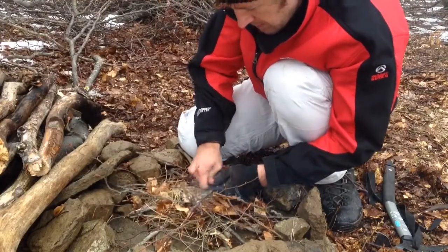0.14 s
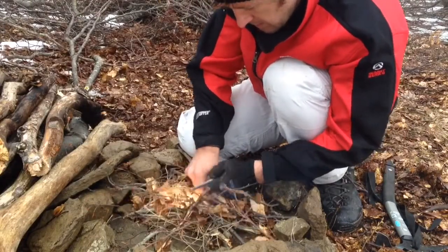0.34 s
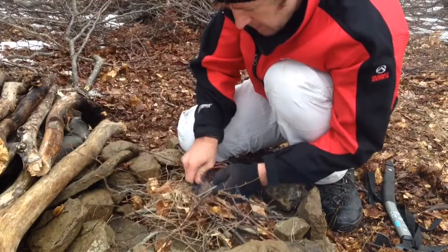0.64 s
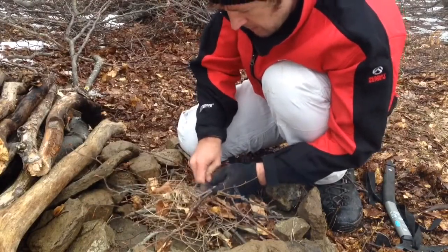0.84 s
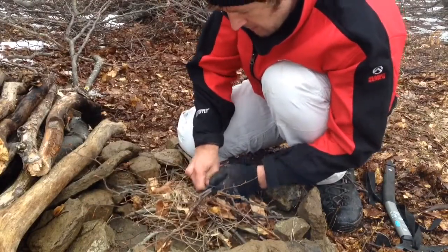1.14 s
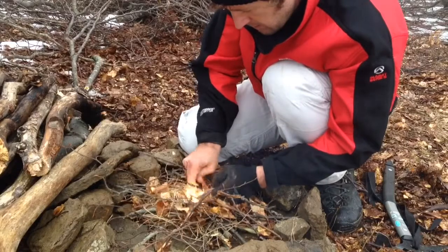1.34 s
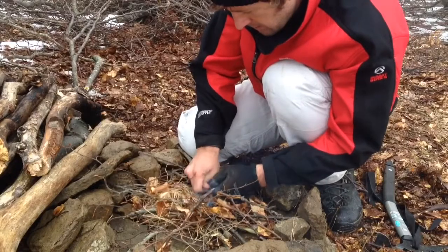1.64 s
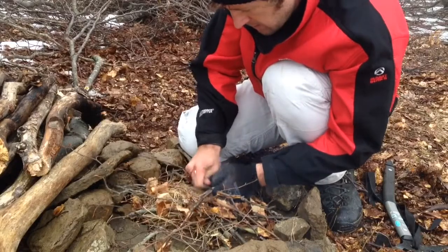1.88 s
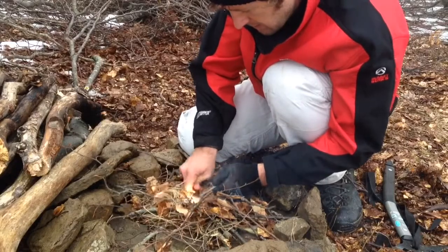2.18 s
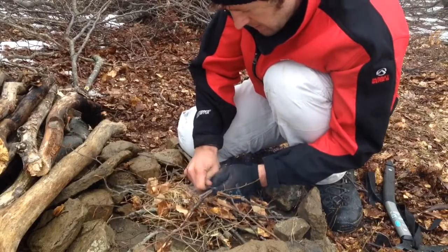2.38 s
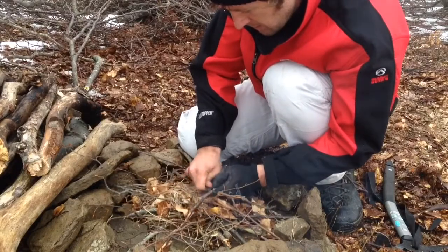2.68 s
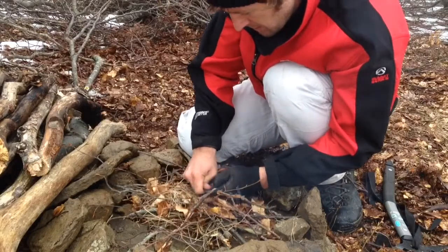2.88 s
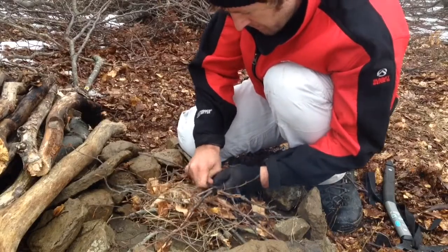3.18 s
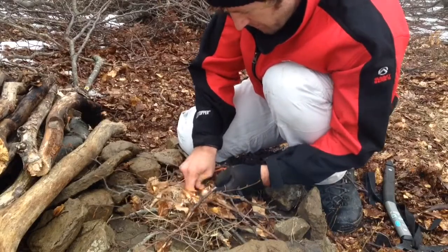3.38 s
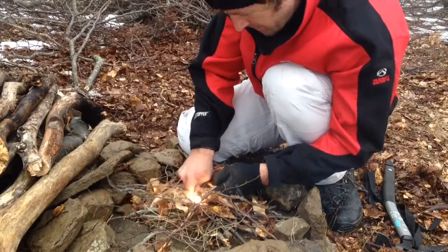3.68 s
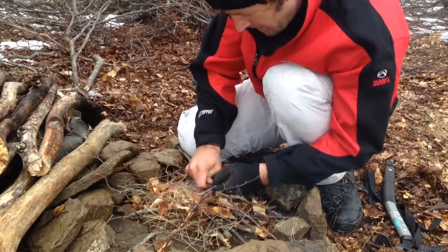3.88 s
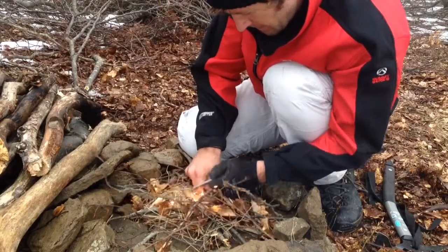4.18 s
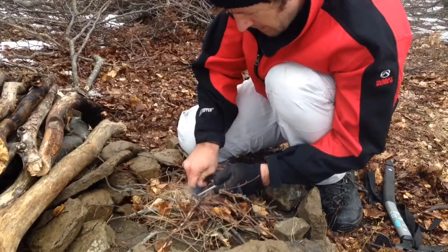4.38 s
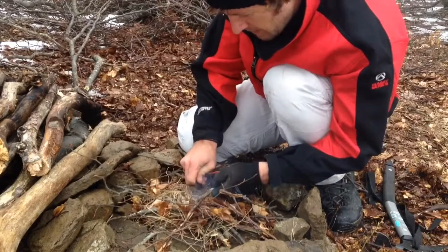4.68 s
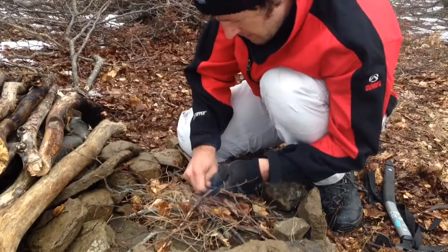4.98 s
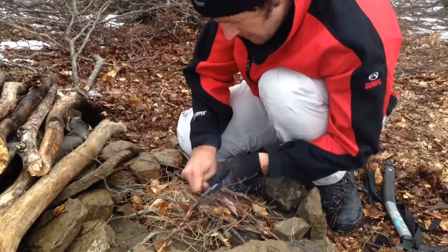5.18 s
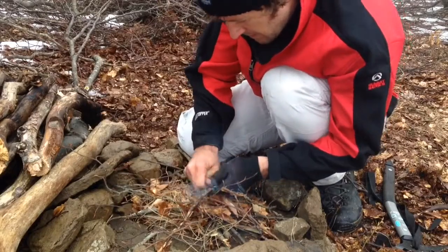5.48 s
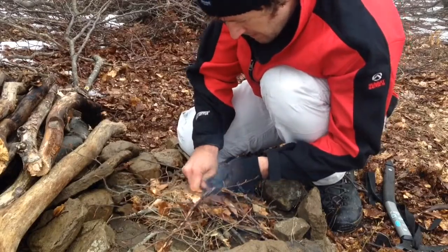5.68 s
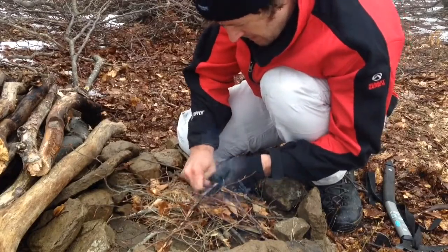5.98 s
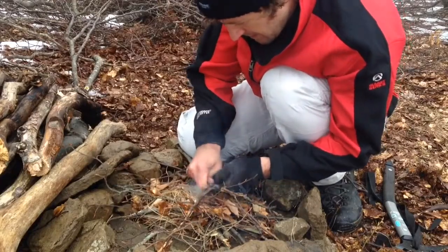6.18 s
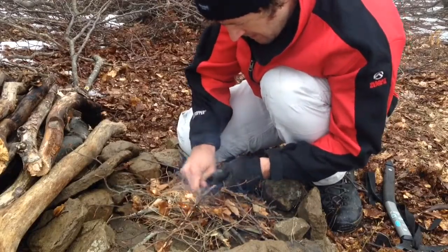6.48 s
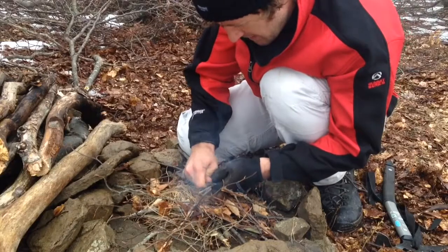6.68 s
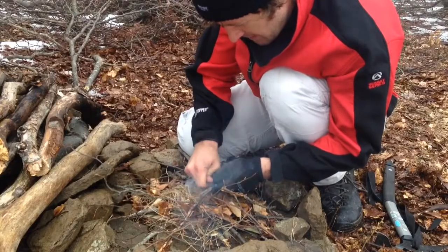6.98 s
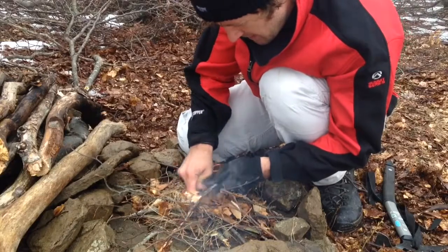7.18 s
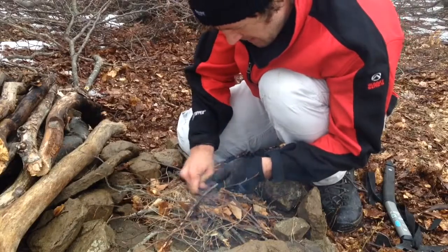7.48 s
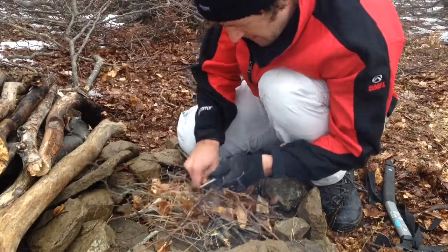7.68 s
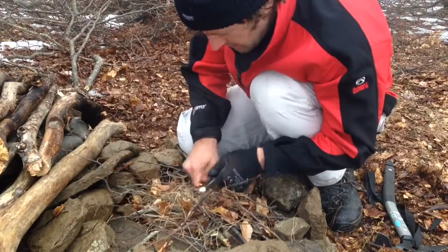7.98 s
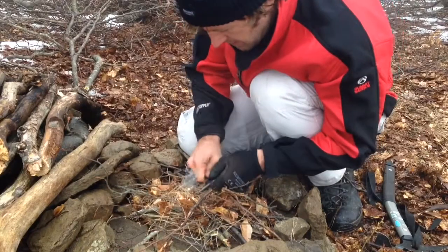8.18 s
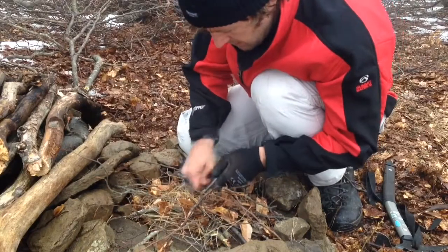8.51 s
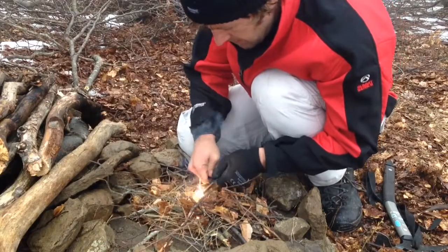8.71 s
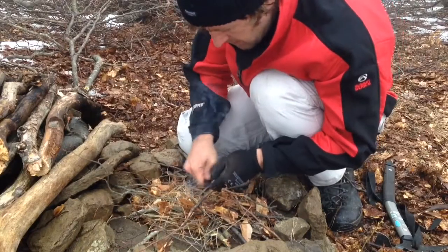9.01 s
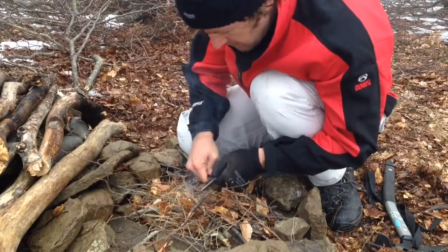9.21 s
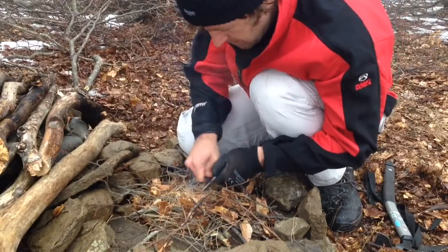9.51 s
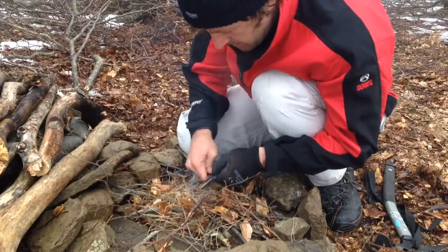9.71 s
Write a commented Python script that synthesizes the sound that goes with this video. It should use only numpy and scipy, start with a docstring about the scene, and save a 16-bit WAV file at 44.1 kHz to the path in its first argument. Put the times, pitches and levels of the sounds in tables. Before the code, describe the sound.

Short, dry metal scrapes repeat roughly two or three per second, bright and gritty, each flaring with a low puff and crackling sparks. Between them come ticks on the rod, faint scuffs and the rustle of sleeves and dry leaves. The longest pause precedes five seconds. The microphone is near, with almost no echo and a faint outdoor hush; the sound briefly cuts out near 7.8 seconds.

```python
"""From the start, a steel striker is scraped down a fire steel twenty times, close by, in a still wood.
Each stroke opens with a rising zip, rasps along the rod and throws sparks that flare and spit.
Light rubs, clicks on the rod and swells of rustle fill the pauses; the longest comes before five seconds.
Two dull bumps of twigs follow it, and the steady rustle starts to thin out at about six seconds.
All sound drops out briefly before eight seconds, another pair of bumps comes, and strokes go on to the end."""
import sys
import numpy as np
from scipy import signal
from scipy.fft import rfft, irfft
from scipy.io import wavfile
from scipy.ndimage import map_coordinates

SR = 44100
rng = np.random.default_rng(int(sys.argv[2]) if len(sys.argv) > 2 else 0)


def to_wav(s):
    """Save 16-bit WAV."""
    ch = np.atleast_2d(s).T  # columns
    pcm = np.round(np.clip(ch, -1, 1) * 32767)  # PCM
    wavfile.write(sys.argv[1], SR, pcm.astype(np.int16))


N = 434385
T = np.arange(N) / SR  # s


def amp(db):
    """Decibels to gain."""
    return 10 ** (np.asarray(db) / 20)


def unit(x):
    """Scales to rms 1."""
    return x / np.sqrt(np.mean(x ** 2) + 1e-20)


def add(mix, s, sound):
    """Mixes a sound in at time s."""
    part = mix[max(round(s * SR), 0):][:len(sound)]
    part += sound[:len(part)]


def colour(x, spectrum, size=4096):
    """Causal filter with the given spectrum, so that clicks keep their sharp fronts."""
    hz, db = np.transpose(spectrum)
    bin_hz = abs(np.fft.fftfreq(size, 1 / SR))
    log_gain = np.log(amp(np.interp(np.log(bin_hz + 1), np.log(hz), db)))
    minimum_phase = np.exp(np.conj(signal.hilbert(log_gain)))
    taps = np.fft.ifft(minimum_phase).real
    return signal.oaconvolve(x, taps[:size // 2])[:len(x)]


def resonate(x, hz, width_hz):
    """A resonance of gain 1 at a fixed or moving frequency."""
    turn = np.exp(2j * np.pi * np.cumsum(hz * np.ones(len(x))) / SR)
    r = np.exp(-np.pi * width_hz / SR)
    # shift the resonance down to 0 Hz, smooth there and shift back
    smoothed = signal.lfilter([1 - r], [1, -r], x / turn + 1e-18)
    return 2 * (turn * smoothed).real


def wander(rate_hz):
    """Smooth chance of rms 1, moving mostly slower than the given rate."""
    slowness = np.exp(-(np.fft.rfftfreq(N, 1 / SR) / rate_hz) ** 2)
    return unit(irfft(rfft(rng.standard_normal(N)) * slowness, N))


def grains(per_s, spread_db, largest=4.44):
    """Random impulses of rms 1 in all; most sizes lie close together, a few stray by several spreads."""
    size = amp(spread_db * np.minimum(rng.exponential(1, N), largest))
    sign = np.sign(rng.standard_normal(N))
    return unit(size * sign * (rng.random(N) < per_s / SR))


# tone of the outdoor air: pitch_hz [Hz], level_db [dB per Hz, relative]
AIR_SPECTRUM = [(15, -33), (25, -31), (59, -0.5), (144, -4.5), (178, -3.5), (227, -4), (260, -6),
                (305, -7.5), (340, -6), (368, -7), (445, -5), (552, -8.5), (997, -12.5), (12800, -24),
                (15500, -27)]


def air(level_db=-59.5, swell_db=2.5):
    """Faint hush of the wood: coloured noise that swells slowly by a few dB."""
    hush = unit(colour(rng.standard_normal(N), AIR_SPECTRUM))
    return amp(level_db) * hush * amp(swell_db * wander(rate_hz=2.5))


# tone of cloth and dry leaves: pitch_hz [Hz], level_db [dB per Hz, relative]
CLOTH_SPECTRUM = [(60, -24), (400, -4), (1200, -2), (2500, -2.5), (5500, -1), (9000, -6), (15000, -8)]
# steady stir of the sleeves, dying down as the arms settle: time_s [s], level_db [dB]
SLEEVE_STIR = [(0, -60.5), (5.2, -60), (5.9, -62.5), (7.45, -66.5), (9.85, -73)]
# sleeves and tinder rustle as the hands shift: loudest_s [s], length_s [s], level_db [dB]
HAND_SHIFTS = [(.15, 0.98, -53), (0.67, 0.6, -54), (1.215, 0.49, -56), (2.047, 0.26, -60),
               (4.364, 0.24, -51), (4.75, 0.38, -53), (4.88, .1, -52.5), (5.04, 0.38, -55.5)]


def rustle():
    """Fine uneven friction of cloth and dry leaves: a steady stir and a swell for each shift of the hands."""
    crumple = amp(1.2 * wander(rate_hz=50))
    friction = grains(per_s=6000, spread_db=3.5, largest=4.5) * crumple
    power = amp(np.interp(T, *np.transpose(SLEEVE_STIR))) ** 2
    for loudest_s, length_s, level_db in HAND_SHIFTS:
        arch = np.cos(np.pi * np.clip((T - loudest_s) / length_s, -.5, .5))
        power += (amp(level_db) * arch) ** 2
    return np.sqrt(power) * unit(colour(friction, CLOTH_SPECTRUM))


def surroundings(x, stones_db=-19, stones_t60=0.022, trees_db=-33, trees_t60=0.3, size=16000):
    """Weak scatter from the stones of the fire ring and a fainter one from the trees, as fading noise."""
    t = np.arange(size) / SR
    tails = []
    for db, t60 in [(stones_db, stones_t60), (trees_db, trees_t60)]:
        fading = rng.standard_normal(size) * amp(-60 * t / t60)
        tails.append(amp(db) * unit(fading * (t > .002)))
    echo = colour(sum(tails) / np.sqrt(size), [(1500, 5.0), (6000, 4.9), (14000, 8.9)])
    return signal.oaconvolve(x, echo)[:N]


# dull bumps of the hands against twigs:
# start_s [s], level_db [dB, before the soft onset], pitch_hz [Hz], t60_s [s]
TWIG_BUMPS = [(5.021, -40.5, 455, .04), (5.055, -43, 520, .03), (8.048, -12, 1040, 0.0078),
              (8.058, -26, 1690, .012)]


def bumps(rise_s=0.0011, size=3000):
    """Soft pushes ring a twig at one dull pitch."""
    out, t = np.zeros(N), np.arange(size) / SR
    for start_s, level_db, pitch_hz, t60_s in TWIG_BUMPS:
        envelope = amp(level_db - 60 * t / t60_s) * (1 - np.exp(-t / rise_s))
        add(out, start_s, envelope * np.sin(2 * np.pi * pitch_hz * t))
    return out


# resonances of rod and striker, damped by the fingers: pitch_hz [Hz], width_hz [Hz], level_db [dB]
STEEL_MODES = [(1105, 220, 7), (1780, 610, 7), (3060, 290, -39.5), (4970, 650, -18), (5480, 690, -7.5),
               (8400, 1000, -12), (10500, 1600, -7), (12400, 1600, -1.5)]
# the striker knocks on the rod: start_s [s], level_db [dB, before the shared trim], dull_hz [Hz],
# bright_hz [Hz], then weights before their trims: lows_db [dB], top_db [dB], bright_ring_db [dB]
ROD_CLICKS = [(0.611, -17, 2980, 6300, -35, -12, 1.5), (0.649, -19, 1670, 12600, -25.5, -17, 0),
              (0.715, -20.5, 1850, 12100, -27, -11, 0), (0.884, -22, 1680, 5940, -14.5, -18, 4),
              (1.5, -25, 1590, 6270, -16, -10, -5), (1.563, -16, 2450, 5460, -20.5, -28, -1),
              (1.877, -15, 1130, 4780, -17.5, -15, -1), (1.926, -23.5, 1630, 7400, -26, -9, -2),
              (1.966, -10, 1230, 5340, -21, -15, -3), (2.355, -19.5, 1510, 6800, -20, -5, 0),
              (2.384, -18, 1190, 5460, -14.5, -26, -7), (2.404, -25, 1780, 14000, -13, -15, -2),
              (2.726, -25, 1510, 6300, -23, -21, 0), (3.479, -21, 1610, 5890, -17, -11, -4),
              (3.536, -22.5, 1160, 5450, -16, -25, -18), (3.573, -24, 1050, 12040, -20, -22, -2),
              (4.497, -13, 1260, 6100, -30.5, -19.5, 2.5), (4.826, -19.5, 1830, 4430, -10, -37, 8.5),
              (4.865, -31, 2050, 3930, -10, -33, 3), (5.389, -14.5, 2270, 13000, -26, -13, -7),
              (5.498, -26, 2120, 7200, -23, -12, 0), (5.513, -21, 2780, 5930, -29, -8, 3),
              (6.283, -12.5, 2840, 10500, -29.5, -16, 0), (6.322, -20.5, 1420, 12200, -27.5, -13, 0),
              (6.663, -32.5, 2790, 5370, -18, -18, -5), (8.245, -23.5, 2140, 4300, -32, -20, 10),
              (8.759, -15.5, 2260, 13400, -21, -14, 3), (8.796, -15, 1550, 11900, -30, -12, 0),
              (8.889, -13, 2860, 3980, -15, -17, 1), (9.686, -12, 2130, 6300, -23.5, -17, -1)]


def clicks(crush=0.12, crush_s=.00035, dull_db=10, bright_db=-3, low_db=4, top_db=6, level_db=-21,
           ring_t60=0.013, size=1500):
    """The contact builds within a millisecond and skids briefly; the point of contact favours two rings."""
    out, t = np.zeros(N), np.arange(size) / SR
    u = t / crush_s
    force = (u / 2) ** 2 * np.exp(2 - u)
    impact = np.arange(size) == np.argmax(force)
    slide = .2 * amp(-60 * t / .016) * (1 - np.exp(-u / 2))
    skid = crush * force + slide
    ring_width_hz = np.log(1000) / (np.pi * ring_t60)
    for start_s, click_db, dull_hz, bright_hz, lows, top, ring_db in ROD_CLICKS:
        blow = impact + skid * rng.standard_normal(size)
        body = sum(amp(mode_db) * resonate(blow, hz, width_hz) for hz, width_hz, mode_db in STEEL_MODES)
        body = colour(body, [(300, lows - 6), (900, lows + low_db), (2200, lows + low_db),
                             (4500, -2.6), (7000, -2.4), (11000, top + top_db)])
        dull = unit(resonate(impact, dull_hz, ring_width_hz))
        bright = unit(resonate(impact, bright_hz, ring_width_hz))
        click = unit(body) + amp(lows + dull_db) * dull + amp(ring_db + bright_db) * bright
        add(out, start_s, amp(click_db + level_db) * unit(click))
    return out


# full strokes down the rod (zips and stroke_levels): bite_s [s, full bite], rise_s [s], slide_s [s],
# release_s [s], rasp_db [dB], rasp_fade [dB per s], ring_db [dB, hollow ring],
# spark_delay_s [s, sparks catch after the bite], flare_db [dB], flare_fade [dB per s],
# zip_db [dB], zip_hz [Hz, mid-zip pitch]; the levels are before each layer's trim
FULL_STROKES = [(0.064, 0.19, 0.0032, 0.031, -37, 55, -43, -0.01, -69, 103, -34, 12900),
                (0.369, 0.11, 0.086, 0.23, -26.5, 35, -36.5, 0.0064, -35.5, 104, -37, 12500),
                (1.368, 0.13, 0.066, 0.21, -29, 93, -39.5, 0.0061, -34, 200, -28.5, 13700),
                (1.814, 0.094, 0.048, 0.092, -33, 6, -41, -0.0038, -47.5, 22, -30.5, 13200),
                (2.231, 0.083, 0.033, 0.17, -30.5, 27, -37.5, 0.027, -38.5, 75, -33, 12900),
                (2.626, 0.077, 0.061, 0.042, -35, 79, -39, 0.026, -47.5, 45, -47, 12800),
                (2.992, 0.065, 0.011, 0.11, -36.5, 229, -43, -0.014, -53.5, 150, -52, 12500),
                (3.373, 0.06, 0.1, 0.27, -27.5, 126, -33.5, 0.021, -45, 93, -38, 13900),
                (3.755, 0.085, 0.095, 0.15, -29.5, 32, -41, 0.0042, -36.5, 59, -23.5, 13300),
                (4.169, 0.043, 0.16, 0.12, -23, 113, -33.5, 0.017, -30.5, 240, -25, 13600),
                (5.302, 0.099, 0.14, 0.053, -30, 55, -42, -0.0097, -39, 99, -26.5, 13200),
                (5.695, 0.11, 0.08, 0.022, -39.5, 38, -49.5, 0.034, -44.5, 213, -34, 13100),
                (6.109, 0.078, 0.024, 0.17, -25.5, 9, -39, 0.0069, -35.5, 99, -27.5, 13400),
                (6.492, 0.065, 0.065, 0.084, -30, 0, -41, 0.02, -41.5, 162, -36.5, 10500),
                (6.879, 0.08, 0.03, 0.2, -29, 47, -41, 0.0071, -38.5, 103, -33, 12500),
                (7.221, 0.11, 0.029, 0.079, -35.5, 25, -44, 0.018, -41, 300, -37, 11000),
                (7.602, 0.097, 0.095, 0.19, -26.5, 55, -37, -0.00092, -36, 150, -34, 11800),
                (8.1, 0.067, 0.051, 0.25, -23, 127, -35.5, -0.0034, -35.5, 83, -24.5, 12800),
                (8.611, 0.074, 0.12, 0.071, -27, 41, -37.5, 0.021, -41, 20, -30, 12700),
                (9.479, 0.086, 0.22, 0.016, -31, 18, -42, 0.014, -45.5, 29, -27, 13300)]
ZIP_LEAD_S, ZIP_S = 0.01, 0.089  # the zip is loudest just before the full bite and lasts this long


def zips(rise_octaves_per_s=4.8, width_hz=1500, waver=0.059, lower_ratio=0.6, lower_db=-9, level_db=-3.0):
    """The edge chatters faster as the hand speeds up: a fuzzy rising whistle with a weaker, lower partner."""
    out, noise, wobble = np.zeros(N), rng.standard_normal(N), wander(rate_hz=360)

    def whistle(now, pitch):
        once = resonate(noise[now], pitch, width_hz)
        return unit(resonate(once, pitch, width_hz))

    for bite_s, *_, zip_db, zip_hz in FULL_STROKES:
        middle_s = bite_s - ZIP_LEAD_S
        now = abs(T - middle_s) < ZIP_S / 2
        glide = 2 ** (rise_octaves_per_s * (T[now] - middle_s))
        pitch = zip_hz * glide * (1 + waver * wobble[now])
        pair = whistle(now, pitch) + amp(lower_db) * whistle(now, lower_ratio * pitch)
        out[now] += amp(zip_db + level_db) * pair * np.hanning(now.sum())
    return out


DEPTH_DB, CURVE = 32, 1.465  # a rise or release spans this many dB; a rise flattens towards its top


def swell(t, rise_s, fall_s):
    """Pressure in dB below its top at t = 0: a rounded rise and fall."""
    return -DEPTH_DB * np.maximum(-t / rise_s, t / fall_s) ** CURVE


# light rubs and short catches of the edge: loudest_s [s], rise_s [s], fall_s [s],
# rasp_db [dB], ring_db [dB, hollow ring], flare_db [dB]; the levels are before each layer's trim
LIGHT_RUBS = [(0.193, 0.06, 0.071, -39.5, -46, -52.5), (0.725, 0.019, 0.057, -39, -45, -48.5),
              (2.722, 0.036, 0.11, -46, -59, -55), (2.777, 0.039, 0.012, -46.5, -44, -60),
              (3.076, 0.15, 0.1, -49, -61, -64), (3.2, 0.062, 0.035, -40.5, -43.5, -58),
              (3.459, 0.019, 0.0096, -26.5, -46, -38.5), (4.438, 0.019, 0.024, -29.5, -55, -63),
              (5.794, 0.037, 0.012, -51, -45, -47), (7.312, 0.064, 0.06, -43, -55, -53.5),
              (8.05, 0.031, 0.018, -28.5, -35.5, -62), (8.259, 0.0084, 0.0056, -29, -59, -42.5),
              (8.792, 0.011, 0.044, -27, -41, -42), (8.867, 0.015, 0.049, -31, -37, -45),
              (9, 0.079, 0.038, -33, -43, -57.5), (9.109, 0.093, 0.045, -40.5, -52, -53),
              (9.793, 0.052, 0.011, -30.5, -48, -48.5), (9.833, 0.053, 0.092, -34.5, -51, -55)]
RING_FOLLOW = 0.77  # the hollow ring follows the pressure by this share
IGNITE_DB_PER_S = 478  # how fast the sparks flare up
LANDS_DB, LANDING_DB = -20.5, 2  # the edge grips once the pressure passes this level, over this range


def stroke_levels():
    """Rasp, ring and flare gains: the edge lands, bites, eases and lifts off; sparks catch and burn down."""
    levels = np.zeros((3, N))
    for (bite_s, rise_s, slide_s, release_s, rasp_db, rasp_fade, ring_db,
         spark_delay_s, flare_db, flare_fade, _, _) in FULL_STROKES:
        now = (T > bite_s - rise_s) & (T < bite_s + slide_s + 2 * release_s)
        t = T[now] - bite_s
        press = swell(t, rise_s, np.inf)
        lift = -DEPTH_DB * np.maximum(t - slide_s, 0) / release_s
        pressure = press - rasp_fade * np.maximum(t, 0) + lift
        lit = t - spark_delay_s
        fire = np.minimum(IGNITE_DB_PER_S * lit, -flare_fade * lit) + lift
        grip = (1 + np.tanh((press - LANDS_DB) / LANDING_DB)) / 2
        levels[:, now] += grip * amp([rasp_db + pressure, ring_db + RING_FOLLOW * pressure, flare_db + fire])
    for loudest_s, rise_s, fall_s, rasp_db, ring_db, flare_db in LIGHT_RUBS:
        now = (T > loudest_s - rise_s) & (T < loudest_s + fall_s)
        pressure = swell(T[now] - loudest_s, rise_s, fall_s)
        levels[:, now] += amp([rasp_db + pressure, ring_db + RING_FOLLOW * pressure, flare_db + pressure])
    return levels


def stick_slip(slips_per_s=260, slip_s=0.002, depth=0.55, judder_db=1.98):
    """The edge catches and breaks free: each slip is a sudden surge that dies within milliseconds."""
    slips = abs(grains(per_s=slips_per_s, spread_db=4.0, largest=4.0))
    surges = unit(signal.lfilter([1], [1, -np.exp(-1 / (slip_s * SR))], slips))
    return unit(1 + depth * surges) * amp(judder_db * wander(rate_hz=65))


def off_the_hand(x, delay_s=0.000686, drift=0.248, echo_gain=.22):
    """A weak echo off the moving hand combs the sound with shifting bands."""
    late = delay_s * np.exp(drift * wander(rate_hz=5.1))
    return unit(x + echo_gain * map_coordinates(x, [(T - late) * SR], order=3))


# tone of the torn shavings: pitch_hz [Hz], level_db [dB per Hz, relative]
RASP_SPECTRUM = [(40, -60), (300, -45), (800, -34), (1300, -13.5), (2000, -18.5), (3200, 1), (4200, -0.5),
                 (5200, 1.5), (6300, 2.5), (8300, -3), (10400, -1), (11400, -1), (13000, 2.5), (15200, -1)]
# tone of the burning sparks: pitch_hz [Hz], level_db [dB per Hz, relative]
FLARE_SPECTRUM = [(20, -52), (55, -11.5), (130, 2), (250, -4.5), (420, -3), (700, -5.5), (1000, -1.5),
                  (1350, -3), (2000, -1.5), (2800, -9.5), (4200, -8.5), (7000, -8.5), (15000, -15.5)]
# resonances of the striker in the closed hand: pitch_hz [Hz, before the hold shifts it],
# width_hz [Hz], level_db [dB, relative]
HOLLOW_MODES = [(1395, 620, -1.5), (2790, 870, 0.5)]


def scraping(rasp_db=0.0, shavings_db=-4, hollow_db=-2, damping_db=-43, sputter_db=1.2, flare_db=7,
             spit_db=-3, hold_shift=.08):
    """The edge tears shavings off the rod; they catch fire with a puff and sharp spits."""
    rasp_gain, hollow_gain, flare_gain = stroke_levels()
    tearing = rng.standard_normal(N) + amp(shavings_db) * grains(per_s=5000, spread_db=5.0)
    rasp = amp(rasp_db) * off_the_hand(colour(tearing, RASP_SPECTRUM))

    hold = np.exp(hold_shift * wander(rate_hz=6.9))  # the resonances shift with the hold of the fingers
    hollow = np.zeros(N)
    for pitch_hz, width_hz, level_db in HOLLOW_MODES:
        once = resonate(tearing, pitch_hz * hold, width_hz)
        hollow += amp(level_db) * resonate(once, pitch_hz * hold, width_hz)
    # pressing hard enough for sparks damps the ring
    damping = np.hypot(1, flare_gain / amp(damping_db))
    hollow = amp(hollow_db) * unit(hollow) / damping

    burning = grains(per_s=7000, spread_db=3.0) * amp(sputter_db * wander(rate_hz=140))
    flare = amp(flare_db) * unit(colour(burning, FLARE_SPECTRUM))
    spits = amp(spit_db) * grains(per_s=150, spread_db=-2.0)  # single sparks burst
    return stick_slip() * (rasp_gain * rasp + hollow_gain * hollow + flare_gain * (flare + spits))


def scene():
    """The fire steel close by, with rustle and outdoor air."""
    steel = scraping() + zips() + clicks() + bumps()
    return (steel + surroundings(steel) + rustle() + air())[None]


def record(dry, dropout_s=7.776, dropout_db=-40, recover_s=0.022, top_hz=15450):
    """All sound drops out for a moment and fades back; a low-pass ends the treble."""
    since = T - dropout_s
    gapped = dry * amp(dropout_db * (since > 0) * np.exp(-abs(since) / recover_s))
    low_pass = signal.firwin(601, top_hz, window=("kaiser", 8), fs=SR)
    return signal.oaconvolve(gapped, low_pass[None], "same")


dry = scene()
out = record(dry)
to_wav(out)
```